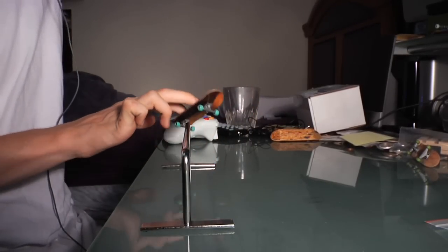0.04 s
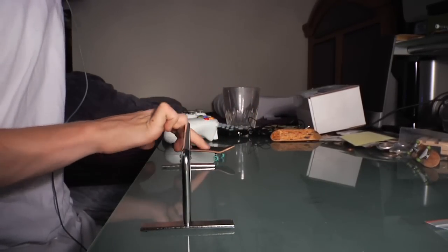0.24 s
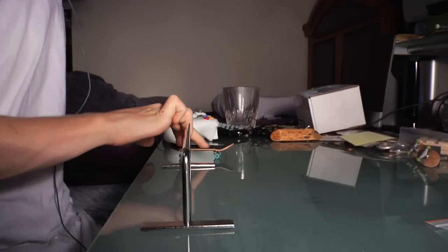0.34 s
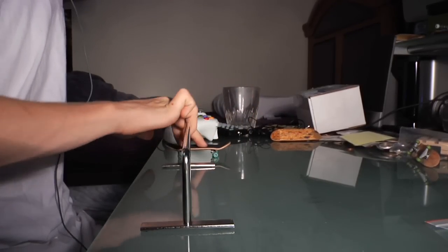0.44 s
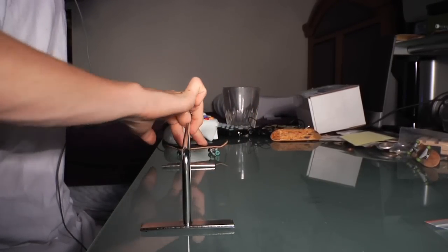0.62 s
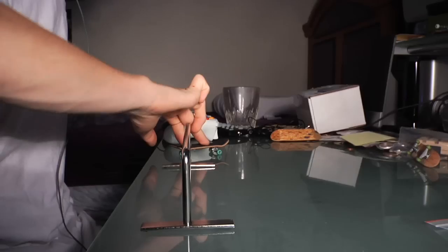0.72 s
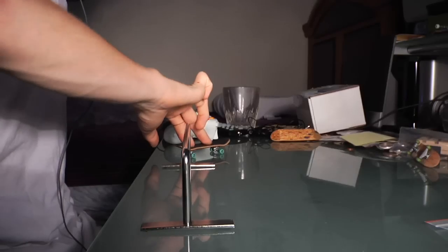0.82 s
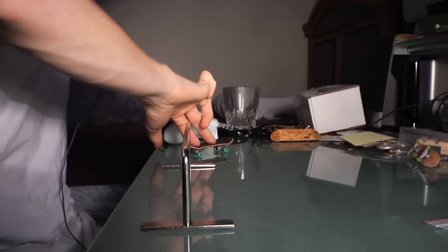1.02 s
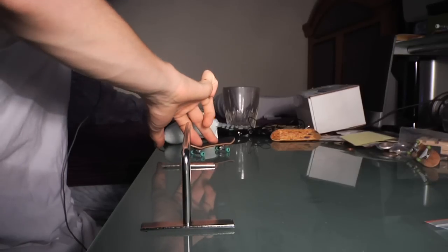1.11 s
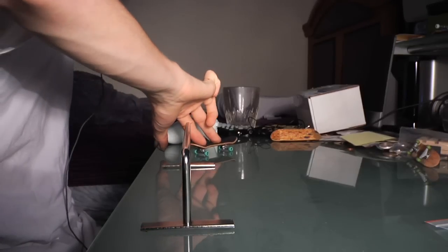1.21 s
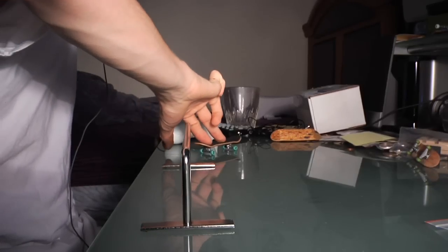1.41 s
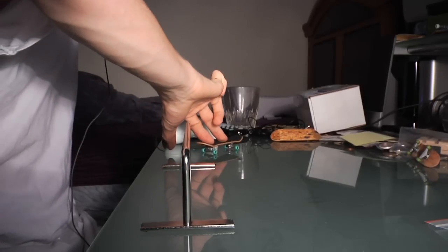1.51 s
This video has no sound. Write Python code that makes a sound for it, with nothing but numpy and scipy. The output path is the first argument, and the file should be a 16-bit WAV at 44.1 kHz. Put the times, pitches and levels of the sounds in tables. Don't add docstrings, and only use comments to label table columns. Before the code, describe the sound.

A small wooden board smacks a metal rail standing on a glass table, a tick and knock running into clustered thuds; a brief high squeak follows, over low appliance hum in a small room, close microphone.

```python
import sys
import numpy as np
from scipy import signal
from scipy.io import wavfile
from scipy.ndimage import uniform_filter1d

SR = 44100
rng = np.random.default_rng(int(sys.argv[2]) if len(sys.argv) > 2 else 0)


def persist_wave(psi):
    counts = np.round(np.clip(psi, -1, 1) * 32767).astype(np.int16)
    wavfile.write(sys.argv[1], SR, np.atleast_2d(counts).T)


def level_to_linear(level):
    exponent = np.asarray(level, float) / 20
    return 10 ** exponent


N = 68355

# (frequency [Hz], density [dB per Hz])
EARLIER_SPECTRUM = [(240, -20), (400, -12.5), (608, 14.5), (728, -30), (882, -6.5), (1720, -38), (2690, -8),
                    (3800, -49.5), (7000, -43), (9100, -35), (15400, -120)]
# (frequency [Hz], width [Hz], level [dB])
EARLIER_RING = [(1330, 200, -46), (2200, 370, -50.5), (2625, 89, -46), (2980, 95, -61.5),
                (5300, 150, -68.5)]
# (frequency [Hz], density [dB per Hz])
AIR_SPECTRUM = [(70, -8), (160, -10), (260, -19.5), (350, -15), (600, -22), (800, -24), (1400, -32.5),
                (8500, -43.5)]
# (frequency [Hz], width [Hz], level [dB])
CASING = [(146, 12, -61.5), (190, 30, -49), (248, 10, -49), (559, 34, -55.5)]
# (time [s], level [dB])
RAIL_HITS = [
    (.2362, -25),
    (.2388, -15),
    (.2415, -18),
    (.2448, -18),
    (.2490, -20),
]
# (time [s], level [dB])
TABLE_HITS = [
    (.2480, -22.5),
    (.2598, -8.5),
    (.2650, -8),
    (.2710, -11.5),
    (.2800, -11),
    (.2920, -15.5),
]
# (frequency [Hz], level [dB], T60 [s])
RAIL_MODES = [(1016, 1.5, 0.048), (193.4, -1, 0.15), (1563, 5.5, 0.015), (1776, 1.5, 0.03),
              (2120, -1.5, 0.013), (2720, 2.5, 0.0062), (3130, -3.5, 0.016), (3270, -6, 0.014),
              (3570, -6, 0.014), (4066, -9, .012), (4140, -28, 0.016), (4780, -12.5, 0.018),
              (6350, -12.5, 0.0032), (6530, -37.5, 0.002)]
# (frequency [Hz], level [dB], T60 [s])
TABLE_MODES = [(143.5, -5.5, 0.067), (216, -3, 0.031), (288, -5, 0.058), (393, -5.5, 0.15), (490, 0, 0.093),
               (565.5, -1.5, .05), (715, 3, 0.02), (764.5, -2, .035), (908, -4, 0.029), (1100, -13.5, .03),
               (1263, -1.5, 0.017), (1440, -37.5, .03), (93.1, -8.5, 0.071), (2640, -19, .008)]
# (time [s], pitch [Hz], level [dB])
SQUEAK = [
    (.552, 2400, -77),
    (.559, 2261, -29),
    (0.565, 2200, -41.5),
    (0.584, 2161, -36.5),
    (0.6, 2198, -38.5),
    (0.608, 2306, -53.5),
    (0.62, 2495, -45),
    (.632, 2470, -76),
]
# (frequency [Hz], T60 [s])
ROOM_T60 = [(100, 0.59), (300, 0.53), (600, 0.58), (1500, 0.53), (2300, 0.62), (3200, 0.64), (5000, 0.45),
            (8500, 0.48)]
# (frequency [Hz], level [dB])
ROOM_COLOUR = [(100, -11.5), (300, -2), (550, -2.8), (900, -5.65), (2600, 4.5), (3900, 0.5), (6500, 6),
               (8500, -13)]

TIME_S = np.arange(N) / SR
EARLIER_DB = -49
AIR_DB, AIR_PATCHY_DB, AIR_PATCHY_HZ = -46, 2.35, 5.9
DRONE_HZ, DRONE_DB, SECOND_HZ, SECOND_DB = 43.47, -34.6, 35.95, -49
IN_STEP_S = 1.052
STRIKE_SPREAD_DB = 2.5
CHATTER_PER_S, CHATTER_DB, CHATTER_T60_S = 1500, -15, 0.04
RING_CYCLES = 45
CRACK_DB, CRACK_T60_S, CRACK_LOW_HZ = -14, 0.008, 3000
BLOW_LOW_HZ = 75
SQUEAK_OCTAVE_DB, SQUEAK_ROOM_DB = -12, -4.5
SQUEAK_WOBBLE_HZ, SQUEAK_WOBBLES_PER_S, SQUEAK_FLUTTER_DB = 45, 110, 4
ROOM_DB, ROOM_GAP_S, ROOM_BUILD_S = 3, 0.0031, 0.016
AGC_THRESHOLD_DB, AGC_SHARE, AGC_RELEASE_DB_PER_S, AGC_ATTACK_S = -25, 0.8, 70, 0.014
CUTOFF_HZ = 8550


def rms_one(x):
    return x / np.sqrt(np.mean(x ** 2) + 1e-20)


def at_hz(points, hz):
    table_hz, value = np.transpose(points)
    return np.interp(np.log(hz), np.log(table_hz), value)


def highpass(x, low_hz):
    return signal.sosfilt(signal.butter(2, low_hz, "high", fs=SR, output="sos"), x)


def drift(rate_hz):
    r = np.exp(-2 * np.pi * rate_hz / SR)
    settle = SR // 2
    wander = signal.lfilter([1], [1, -2 * r, r * r], rng.standard_normal(N + settle))
    return rms_one(wander[settle:])


def bands(gain):
    edges_hz = 60 * 2 ** (np.arange(23) / 3)
    settle = 4096
    white = rng.standard_normal((2, N + settle))
    out = np.zeros(N)
    for k, (low, high) in enumerate(zip(edges_hz, edges_hz[1:])):
        sos = signal.butter(2, [low, high], "band", fs=SR, output="sos")
        out += gain(np.sqrt(low * high)) * signal.sosfilt(sos, white[k % 2])[settle:]
    return out


def resonance(hz, width_hz):
    r = np.exp(-np.pi * width_hz / SR)
    poles = [1, -2 * r * np.cos(2 * np.pi * hz / SR), r * r]
    return rms_one(signal.lfilter([1, 0, -1], poles, rng.standard_normal(N)))


def decay(hz):
    return level_to_linear(-60 * TIME_S / at_hz(ROOM_T60, hz))


def earlier_knock():
    tail = bands(lambda hz: level_to_linear(at_hz(EARLIER_SPECTRUM, hz) - 30 * (hz < 400)) * decay(hz))
    rings = sum(level_to_linear(db) * resonance(hz, width_hz) * decay(hz) for hz, width_hz, db in EARLIER_RING)
    start_rms = np.sqrt(np.mean(tail[:SR // 50] ** 2))
    return level_to_linear(EARLIER_DB - 4) * tail / start_rms + rings


def air_noise():
    noise = bands(lambda hz: level_to_linear(at_hz(AIR_SPECTRUM, hz) + AIR_PATCHY_DB * drift(AIR_PATCHY_HZ)))
    return level_to_linear(AIR_DB) * rms_one(noise)


def casing_murmur():
    return sum(level_to_linear(db) * resonance(hz, width_hz) for hz, width_hz, db in CASING)


def drones():
    turn = 2 * np.pi * (TIME_S - IN_STEP_S)
    first = level_to_linear(DRONE_DB) * np.cos(DRONE_HZ * turn)
    second = level_to_linear(SECOND_DB) * np.cos(SECOND_HZ * turn)
    return np.sqrt(2) * (first + second)


def struck(hits, modes):
    hit_s, hit_db = np.transpose(hits)
    spread_db = STRIKE_SPREAD_DB * rng.standard_normal((len(hit_s), len(modes)))
    age_s = TIME_S - hit_s[:, None]
    fall_db = hit_db[:, None] + CHATTER_DB - 60 * np.abs(age_s) / CHATTER_T60_S
    chatter = np.sum(level_to_linear(fall_db) * (age_s > 0), axis=0)
    chatter *= rng.random(N) < CHATTER_PER_S / SR
    out = np.zeros(N)
    for k, (hz, level_db, t60_s) in enumerate(modes):
        clicks = chatter * rng.standard_normal(N) + 1e-18
        clicks[(hit_s * SR).astype(int)] = level_to_linear(hit_db + spread_db[:, k]) * (-1) ** k
        r = level_to_linear(-60 / (min(t60_s, RING_CYCLES / hz) * SR))
        w = 2 * np.pi * hz / SR
        out += level_to_linear(level_db) * signal.lfilter([0, np.sin(w)], [1, -2 * r * np.cos(w), r * r], clicks)
    return out


def crack():
    age_s = TIME_S - RAIL_HITS[1][0]
    envelope = level_to_linear(CRACK_DB - 60 * np.abs(age_s) / CRACK_T60_S) * (age_s > 0)
    return envelope * highpass(rng.standard_normal(N), CRACK_LOW_HZ)


def squeak():
    s, hz, db = np.transpose(SQUEAK)
    pitch_hz = np.interp(TIME_S, s, hz) + SQUEAK_WOBBLE_HZ * drift(SQUEAK_WOBBLES_PER_S)
    phase = 2 * np.pi * np.cumsum(pitch_hz) / SR
    flutter_db = SQUEAK_FLUTTER_DB * drift(SQUEAK_WOBBLES_PER_S)
    level = level_to_linear(np.interp(TIME_S, s, db, -200, -200) + flutter_db)
    octave = level_to_linear(SQUEAK_OCTAVE_DB + 0.5 * (np.interp(TIME_S, s, db) - db.max()))
    return np.sqrt(2) * level * (np.sin(phase) + octave * np.sin(2 * phase))


def room(x):
    age_s = np.maximum(TIME_S - ROOM_GAP_S, 0)
    tail = bands(lambda hz: level_to_linear(at_hz(ROOM_COLOUR, hz)) * decay(hz))
    tail *= 1 - np.exp(-age_s / ROOM_BUILD_S)
    return signal.fftconvolve(x, tail / np.sqrt(np.sum(tail ** 2)))[:N]


def scene():
    blow = struck(RAIL_HITS, RAIL_MODES) + struck(TABLE_HITS, TABLE_MODES) + crack()
    blow = highpass(blow, BLOW_LOW_HZ)
    rub = squeak()
    wet = room(level_to_linear(ROOM_DB) * blow + level_to_linear(SQUEAK_ROOM_DB) * rub)
    background = earlier_knock() + air_noise() + casing_murmur() + drones()
    return (blow + rub + wet + background)[None]


def band_limit(x):
    return signal.sosfilt(signal.butter(12, 9320, fs=SR, output="sos"), x)


def record(dry):
    release_db = AGC_RELEASE_DB_PER_S * TIME_S
    level_db = 10 * np.log10(uniform_filter1d(dry[0] ** 2, size=400, origin=199) + 1e-12)
    held_db = np.maximum.accumulate(level_db + release_db) - release_db
    over_db = np.maximum(held_db - AGC_THRESHOLD_DB, 0)
    r = np.exp(-1 / (AGC_ATTACK_S * SR))
    duck_db = AGC_SHARE * signal.lfilter([(1 - r) ** 2], [1, -2 * r, r * r], over_db)
    top_cut = signal.cheby2(16, 100, CUTOFF_HZ * 1.184, fs=SR, output="sos")
    mix = signal.sosfilt(top_cut, dry * level_to_linear(-duck_db))
    return band_limit(mix)


dry = scene()
out = record(dry)
persist_wave(out)
```